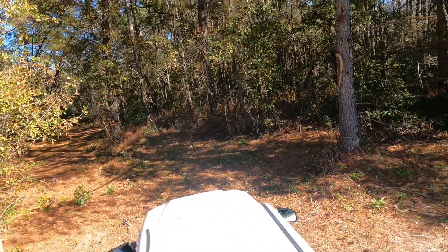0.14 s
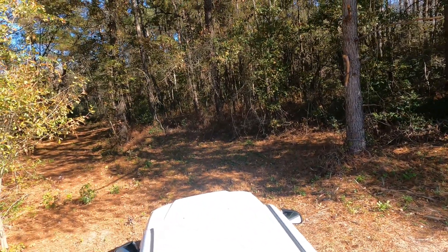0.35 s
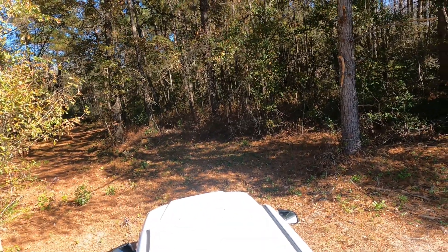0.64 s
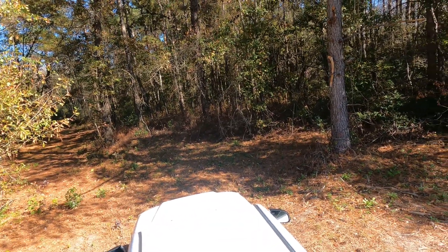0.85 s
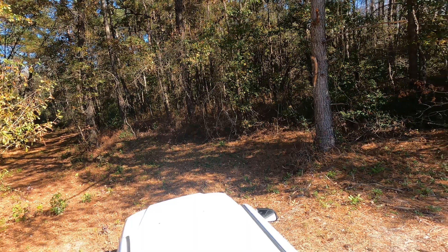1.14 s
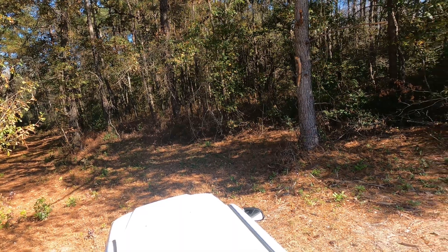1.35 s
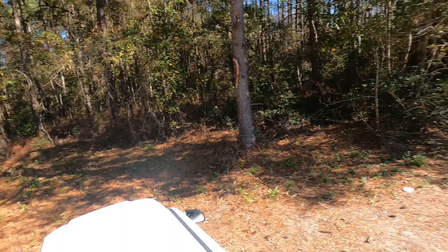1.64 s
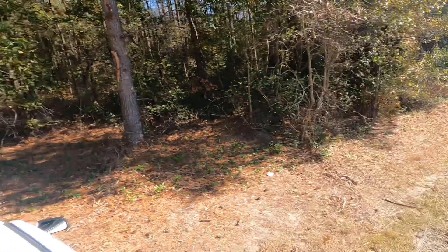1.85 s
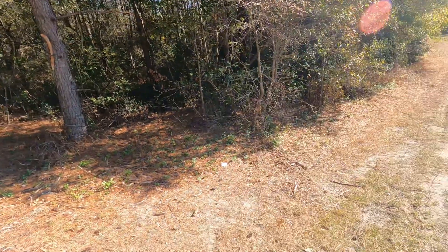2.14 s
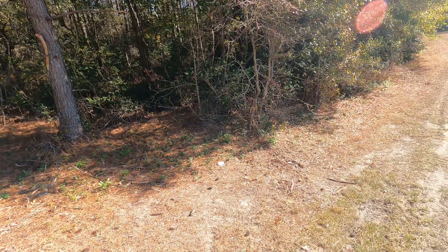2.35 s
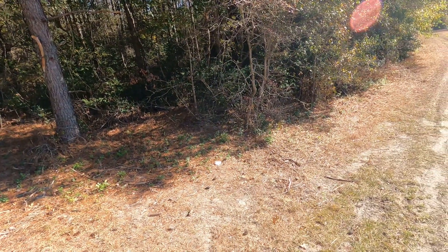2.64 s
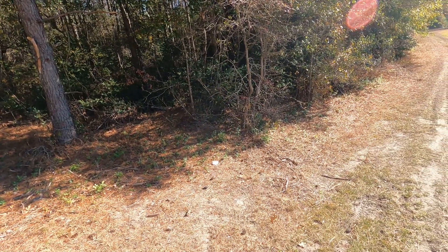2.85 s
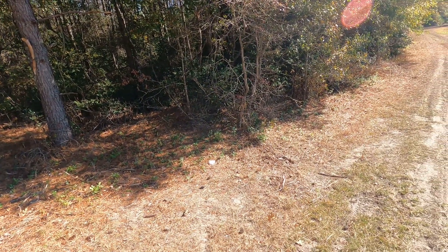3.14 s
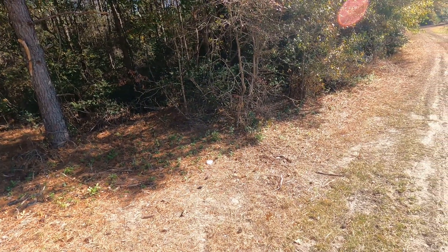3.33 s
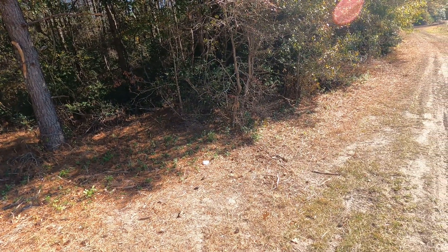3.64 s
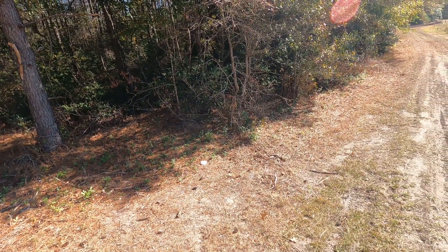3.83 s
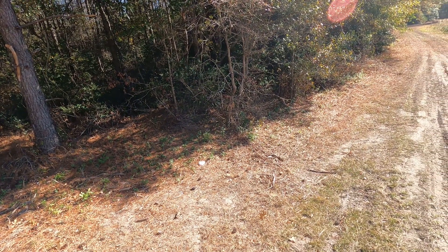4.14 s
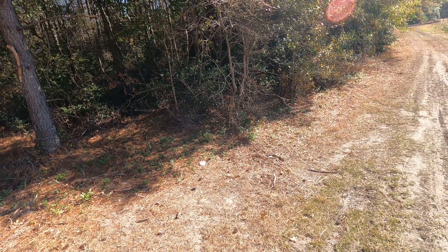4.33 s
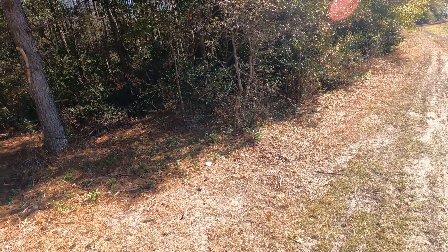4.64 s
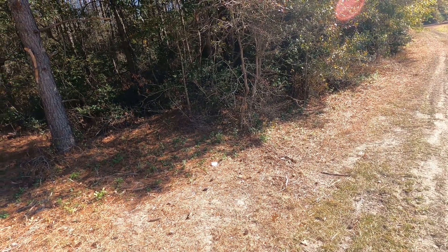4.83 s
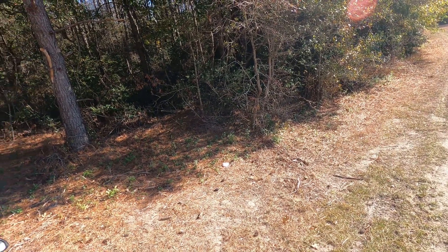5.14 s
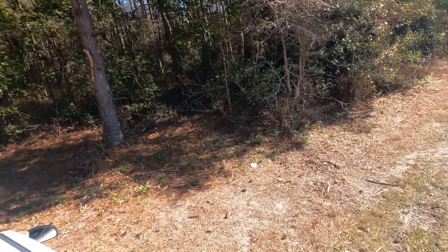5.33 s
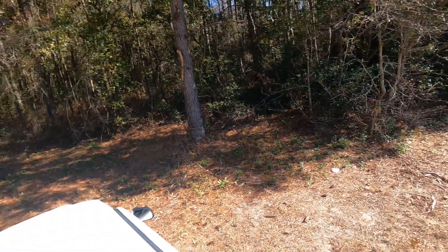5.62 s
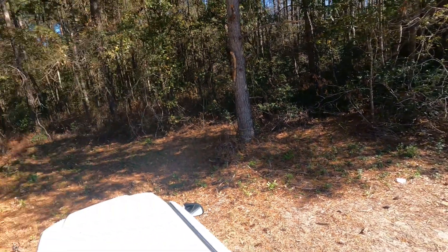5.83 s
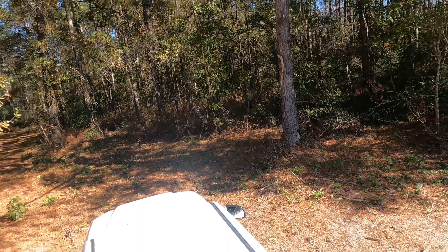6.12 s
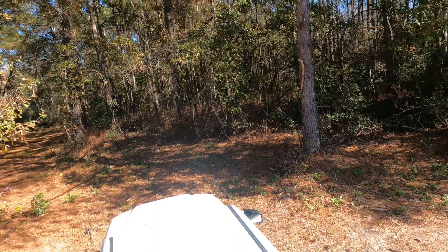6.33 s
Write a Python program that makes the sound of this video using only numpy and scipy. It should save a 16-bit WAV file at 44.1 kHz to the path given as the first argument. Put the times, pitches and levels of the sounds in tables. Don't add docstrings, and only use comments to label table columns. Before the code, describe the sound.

Far-off hunting dogs cry in short ringing yelps through the trees while crickets trill all around and light wind bumps the microphone.

```python
import sys
import numpy as np
from scipy import signal
from scipy.fft import rfft, irfft
from scipy.io import wavfile
from scipy.ndimage import uniform_filter1d

SR = 44100
rng = np.random.default_rng(int(sys.argv[2]) if len(sys.argv) > 2 else 0)


def persist_wave(psi):
    counts = np.round(np.clip(psi, -1, 1) * 32767).astype(np.int16)
    wavfile.write(sys.argv[1], SR, np.atleast_2d(counts).T)


def gain_from_decibels(decibels):
    exponent = np.asarray(decibels, float) / 20
    return 10 ** exponent


N = 285768
LEAD = 1


def evened(x):
    return x / np.sqrt(np.mean(x ** 2) + 1e-20)


def read(points, hz):
    f, value = np.transpose(points)
    return np.interp(np.log(hz + 1), np.log(f + 1), value)


def curve(rows):
    s, *columns = np.transpose(rows)
    return [np.interp(np.arange(N) / SR, s, c) for c in columns]


def add(mix, s, sound):
    part = mix[..., round(s * SR):][..., :sound.shape[-1]]
    part += sound[..., :part.shape[-1]]


def sides(pan_db):
    return gain_from_decibels(np.array([pan_db / 2, -pan_db / 2]))


def turned(ends, s=None):
    # time_s, turn (0-1)
    turning = [
        (0, 0),
        (.85, 0),
        (1.05, .15),
        (1.35, .08),
        (1.8, .55),
        (2.2, .95),
        (5.2, 1),
        (5.7, .4),
        (5.9, .03),
        (6.48, 0),
    ]
    at, turn = np.transpose(turning)
    when = np.arange(N) / SR if s is None else s
    return ends[0] + (ends[1] - ends[0]) * np.clip(np.interp(when, at, turn), 0, 1)


def colour(x, gain_db, lag_s=0):
    hz = np.fft.rfftfreq(x.shape[-1], 1 / SR)
    return irfft(rfft(x) * gain_from_decibels(read(gain_db, hz)) * np.exp(-2j * np.pi * hz * lag_s), x.shape[-1])


def resonate(x, hz, width):
    r = np.exp(-np.pi * width / SR)
    a = [1, -2 * r * np.cos(2 * np.pi * hz / SR), r * r]
    return signal.lfilter([1], a, signal.lfilter([1, 0, -1], a, x))


def pair(hz, width, same):
    a, b = rng.standard_normal((2, N))
    same = np.clip(same, 0, 1)
    return evened(resonate(np.array([a, same * a + np.sqrt(1 - same ** 2) * b]), hz, width))


def noise(gain_db, pan_db, patchy_db):
    # pitch_hz, likeness (0-1)
    likeness = [(30, 0.65), (100, 0.28), (200, 0.76), (600, 0.13), (2000, 0.12), (8000, 0.71)]
    frames, hz = N // 256 + 5, np.fft.rfftfreq(1024, 1 / SR)
    a, b, c, d, patches = rng.standard_normal((frames, 513, 5)).T
    patches = evened(uniform_filter1d(uniform_filter1d(patches, size=10, axis=0), size=14, axis=1))
    same = np.clip(read(likeness, hz), -1, 1)[:, None]
    left = a + 1j * b
    z = np.array([left, same * left + np.sqrt(1 - same ** 2) * (c + 1j * d)])
    z *= gain_from_decibels(read(gain_db, hz)[:, None] + patchy_db * patches)
    z *= sides(read(pan_db, hz))[:, :, None]
    return evened(signal.istft(z, nperseg=1024, noverlap=768)[1][:, :N])


def roughness(effort_db):
    return np.clip(.018 * (-35 - effort_db), 0, 1)


def yelp(start, length, first_hz, top_hz, effort_db):
    glide_share, swell_db = 0.501, 5.5
    rough = roughness(effort_db)
    return [(start, first_hz, effort_db - swell_db, rough),
            (start + glide_share * length, top_hz, effort_db - swell_db * (1 - glide_share), rough),
            (start + length, top_hz, effort_db, rough)]


def bay(start, length, hz, first_db, last_db):
    scoop_s, scoop_share, scoop_db = 0.014, 0.035, 2.5
    sag_hz_per_s = 264.5
    return [(start, hz * (1 - scoop_share), first_db - scoop_db, roughness(first_db)),
            (start + scoop_s, hz, first_db, roughness(first_db)),
            (start + length, hz - sag_hz_per_s * length, last_db, roughness(last_db))]


def note(rows):
    # pitch_hz, level_db
    throat = [(400, -21), (680, -5), (1000, -4.5), (1350, 3), (1700, -9.5), (2100, -22.5), (2500, -25.5),
              (3000, -61)]
    # pitch_hz, level_db per Hz
    breath = [(450, -61), (600, 24), (800, 19), (1200, -40), (1500, 8), (2200, 7.5), (2600, -62)]
    s, *columns = np.transpose(rows)
    t = np.arange(s[0], s[-1], 1 / SR)
    hz, effort_db, rough = (np.interp(t, s, c) for c in columns)
    shake, air = rng.standard_normal((2, SR))
    shake = evened(uniform_filter1d(shake, size=60))[:len(t)]
    turns = np.cumsum(hz * (1 + 0.23 * rough * shake)) / SR
    voice = sum(gain_from_decibels(read(throat, k * hz)) * np.cos(2 * np.pi * k * turns) for k in range(1, 5))
    air = evened(irfft(rfft(air) * gain_from_decibels(read(breath, np.arange(SR // 2 + 1)))))[:len(t)]
    voice = voice * (1 + rough * np.cos(np.pi * turns)) * np.sqrt(2) + 1.1 * rough * air
    return s[0] + LEAD, gain_from_decibels(effort_db) * voice * signal.windows.tukey(len(t), .25)


def woods(x, same):
    # pitch_hz, die_s
    dying = [(500, 4.2), (750, 4.3), (1000, 3.85), (1400, 2.78), (2000, 2.9), (3000, 0.87)]
    # delay_s, level_db
    tree_lines = [
        (.05, -7.5),
        (.105, -11.5),
        (0.161, -11),
        (.27, -13),
    ]
    size = 3 * SR
    taps = np.zeros((2, size))
    at = np.arange(500, size - 20, 20) + rng.integers(0, 20, (2, (size - 501) // 20))
    np.put_along_axis(taps, at, rng.choice([-1., 1.], at.shape), 1)
    hz, t, z = signal.stft(taps, SR, nperseg=256)
    tail = signal.istft(z * gain_from_decibels(-60 * t / read(dying, hz)[:, None]), SR, nperseg=256)[1]
    tail = tail * gain_from_decibels(-27.5)
    for delay, db in tree_lines:
        add(tail[0], delay, gain_from_decibels(db) * np.ones(1))
    mid, side = signal.fftconvolve(x[None], tail, axes=1)
    return np.array([mid + (1 - same) * side, mid - (1 - same) * side])


def hounds():
    # start_s, length_s, first_hz, top_hz, effort_db
    yelps = [(-.26, .06, 760, 840, -52), (-.2, 0.062, 1084, 1127, -44), (2.595, 0.0697, 989, 1129, -33),
             (2.908, 0.049, 963.5, 1020, -31.5), (3.225, 0.04, 770, 815, -49),
             (3.237, 0.028, 984, 1148, -40), (3.629, 0.022, 800, 833, -48.5),
             (3.642, 0.032, 996, 1055, -39), (4.08, 0.022, 781, 788, -49), (4.1, 0.0373, 1010, 1141, -37),
             (5.81, 0.048, 878, 887, -44.5), (6.14, .025, 752, 840, -45), (6.161, .047, 932, 1055, -40.5)]
    # start_s, length_s, pitch_hz, first_db, last_db
    bays = [
        (-.15, .13, 697.7, -47, -46.5),
        (2.656, 0.0647, 702, -38, -63),
        (2.956, 0.041, 677.3, -40, -40.5),
        (3.266, 0.06, 686.4, -46, -49),
        (3.668, 0.049, 673, -40, -38),
        (4.125, 0.0766, 663.3, -39, -55),
        (5.836, 0.13, 689.8, -47, -48.5),
        (6.18, 0.14, 657.8, -43.5, -54),
    ]
    # time_s, pitch_hz, effort_db, roughness (0-1)
    far_cry = [
        (1.2, 769, -57, 0.16),
        (1.3, 753, -66.5, 0.04),
        (1.45, 732, -75, 0.09),
        (1.6, 746, -61.5, 0),
        (1.75, 754, -84, 0.06),
    ]
    # pitch_hz, gain_db
    scatter = [(500, 6.5), (680, 1), (820, 9), (1000, 2.5), (1400, 2), (2200, 1.5)]
    dry = np.zeros(N + LEAD * SR)
    for rows in [yelp(*row) for row in yelps] + [bay(*row) for row in bays]:
        add(dry, *note(rows))
    shimmer = rng.standard_normal(len(dry))
    shimmer = evened(uniform_filter1d(uniform_filter1d(shimmer, size=250), size=250))
    smeared = (signal.hilbert(dry) * np.exp(.44j * shimmer)).real
    wet = woods(colour(smeared, scatter), same=0.74)[:, :len(dry)]
    dip_hz, dip_width_hz, dip_share = 560, 530, 0.79
    low = signal.lfilter(*signal.iirpeak(dip_hz, dip_hz / dip_width_hz, SR), dry)
    start, howl = note(far_cry)
    add(wet, start, colour(howl, [(800, 7), (1300, -30)]) * shimmer[:len(howl)])
    ports = gain_from_decibels(3.0) * (dry - dip_share * low) + wet
    ports = colour(ports, [(500, -0.064), (2000, 0.079)], lag_s=np.array([[8e-5], [0]]))
    return ports[:, LEAD * SR:] * sides(-0.59)[:, None]


def chorus():
    # pitch_hz, level_db per Hz
    spread = [(3200, -24.5), (3450, -18.5), (3600, -18), (3750, -3.5), (3940, 0), (4190, -5), (4330, -18.5),
              (4550, -19), (4900, -16.5)]
    level_db, pan_db = -47.5, turned((5.5, 0.5))
    t, out = np.arange(N) / SR, np.zeros((2, N))
    drift = np.cumsum(rng.standard_normal(2 * N)) * 0.0818
    tones = np.linspace(3500, 4500, 30)
    for k, (beat, start, place, size) in enumerate(rng.standard_normal((30, 4))):
        cycle = 2 * np.pi * (43 * (1 + .06 * beat) * t + start)
        wing = np.sin(cycle)
        turn = 2 * np.pi * tones[k] * t + 2.07 * wing + drift[k * 9000:][:N]
        tone = np.sin(turn + np.array([[.6], [-.6]]) * place)
        out += gain_from_decibels(1.5 * size) * np.maximum(wing + .3, 0) * tone
    blur = pair(hz=3850, width=1800, same=0.62)
    return gain_from_decibels(level_db) * sides(pan_db) * evened(colour(evened(out) + 0.54 * blur, spread))


def katydid():
    # time_s, effort_db
    effort = [
        (0, -76),
        (.35, -69),
        (.7, -74),
        (1.2, -70.5),
        (1.7, -76.5),
        (5.9, -78.5),
        (6.3, -71.5),
        (6.48, -80),
    ]
    # pitch_hz, level_db per Hz
    far_colour = [(9000, -30), (10500, -9), (12000, -11), (13000, -10), (13600, -19), (13900, -38)]
    strokes_per_s = 64
    level_db = curve(effort)[0] + turned((0, -8.5))
    scrape = np.exp(1.5 * np.cos(2 * np.pi * strokes_per_s * np.arange(N) / SR))
    near = gain_from_decibels(-1.5) * sides(26.0)[:, None] * evened(scrape * pair(hz=12000, width=810, same=0.94))
    far = gain_from_decibels(5.0) * noise(far_colour, [(9000, 15), (16000, 22)], patchy_db=4.5)
    trill = gain_from_decibels(-71.5 + turned((0, 0.5))) * sides(2.8)[:, None] * pair(hz=8450, width=190, same=0.39)
    flicker = evened(uniform_filter1d(rng.standard_normal(N), size=1800))
    heard = flicker > turned((-.9, 11))
    fizz = noise([(13400, -60), (13700, -4.0), (15700, -9)], [(9000, 8), (16000, 8)], patchy_db=5.0)
    top = gain_from_decibels(level_db - 5) * heard * fizz
    return colour(gain_from_decibels(level_db) * (near + far) + trill, [(13600, -2.0), (14000, -59)]) + top


def wind():
    # middle_s, length_s, lump_db, flutter_db
    gusts = [(0.05, 0.13, -44.5, -68), (0.53, 0.13, -42, -55), (1.069, 0.36, -55, -56.5),
             (1.515, 0.23, -50, -54.5), (1.737, 0.096, -44, -70), (1.982, 0.48, -50, -49.5),
             (2.428, 0.58, -50, -51.5), (2.778, 0.23, -68, -45.5), (3.04, 0.27, -69, -46.5),
             (3.285, 0.19, -48, -54.5), (3.5, .15, -57, -50), (3.695, 0.29, -59, -66), (4, .15, -48, -53),
             (4.178, 0.18, -50, -71), (4.485, 0.22, -60, -49.5), (4.786, 0.084, -56, -78),
             (5.008, 0.092, -54, -49), (5.506, 0.33, -43.5, -56), (5.78, 0.14, -57, -56.5),
             (6.005, 0.12, -43, -51.5), (6.227, 0.11, -53, -61), (6.47, 0.14, -44.5, -54)]
    calm_db = np.array((-63, -81.5))
    t = np.arange(N) / SR
    blow = gain_from_decibels(calm_db)[:, None] * np.ones(N)
    for middle, length, *db in gusts:
        blow = blow + gain_from_decibels(np.array(db) - 2.5)[:, None] * np.exp(-(2.86 * (t - middle) / length) ** 2)
    lumps = blow[0] * pair(hz=26.7, width=25, same=0.7)
    flutter = blow[1] * pair(hz=78.6, width=66, same=.9)
    return (lumps + flutter) * sides(-0.95)[:, None]


def road():
    # time_s, level_db
    traffic = [
        (0, -59),
        (1.1, -54.5),
        (1.7, -56.5),
        (3.2, -61),
        (3.4, -54),
        (4.3, -53.5),
        (5.1, -53.5),
        (5.6, -55),
        (6.48, -59),
    ]
    rumble = gain_from_decibels(curve(traffic)[0]) * pair(hz=172.5, width=79, same=0.67) * sides(-1.9)[:, None]
    waver = rng.standard_normal(N)
    waver = evened(uniform_filter1d(uniform_filter1d(waver, size=4000), size=4000))
    return rumble * gain_from_decibels(3 * waver)


def leaves_and_air():
    # pitch_hz, level_db per Hz
    hiss = [(60, -26.5), (250, 4), (500, -3.5), (1000, -5.5), (1500, -9), (2000, -12.5), (3000, -18),
            (5000, -23.5), (6500, -17), (8000, -11.5), (10500, -23.5), (12600, -25.5), (13300, -38),
            (13800, -75)]
    # pitch_hz, left_over_right_db
    balance = [(100, -9), (300, -5.5), (1000, -3), (3000, 1.5), (8000, 1.5), (13000, -4)]
    return gain_from_decibels(-58) * noise(hiss, balance, patchy_db=2.1)


def chirp(length, hz, glide, arch):
    u = np.linspace(-1, 1, round(length * SR))
    tone = np.sin(2 * np.pi * np.cumsum(hz + glide * u - arch * u ** 2) / SR)
    return tone * signal.windows.tukey(len(u), .4)


def strokes(runs):
    return [(s, np.interp(s, [start, end], [first_db, last_db]))
            for start, end, gap, first_db, last_db in runs
            for s in np.arange(start, end, gap)]


def ground_crickets():
    # start_s, end_s, gap_s, first_db, last_db
    runs = [
        (.079, 1.5, .1268, -57, -53.5),
        (1.6252, 1.8, .1287, -54.5, -55.5),
        (1.8911, 2.32, .1319, -61, -63),
        (2.4279, 4.7, .1241, -62.5, -63),
        (5.28, 5.8, .1211, -65, -58),
        (5.9214, 6.46, .1298, -58, -54),
    ]
    out = np.zeros((2, N))
    for s, db in strokes(runs):
        stroke = chirp(0.021, hz=turned((7300, 7360), s), glide=-82, arch=466)
        after = chirp(0.035, hz=7250, glide=70, arch=200)
        add(out, s - .002, gain_from_decibels(db) * sides(8.9)[:, None] * stroke)
        add(out, s + 0.013, gain_from_decibels(db - 8.5) * sides(9.9)[:, None] * after)
    return out


def buzzing_insect():
    # start_s, end_s, gap_s, first_db, last_db
    runs = [
        (.136, 5.05, .2205, -69, -73.5),
        (5.265, 6.4, .2245, -72, -74),
    ]
    gate = np.zeros(N)
    for s, db in strokes(runs):
        add(gate, s, gain_from_decibels(db) * np.hanning(round(.09 * SR)))
    return gate * gain_from_decibels(turned((0, -2))) * sides(4.0)[:, None] * pair(hz=9350, width=300, same=.7)


def field_cricket():
    starts = [0.206, 0.6782, 1.1636, 1.6107, 2.08, 2.5376, 3.0056, 3.468, 3.933, 4.4002, 4.8614, 5.3295,
              5.8017, 6.2502]
    out = np.zeros((2, N))
    for s in starts:
        gains = gain_from_decibels(-51) * sides(turned((-5, 5), s))[:, None]
        for gap in (0, .0235):
            add(out, s + gap - .002, gains * chirp(.018, hz=5459, glide=-130, arch=-25))
    return out


def handling():
    # start_s, level_db, centre_hz, die_s (time to fall 60 dB)
    ticks = [(0.542, -57, 6850, 0.019), (1.059, -58.5, 7940, 0.13), (1.514, -55, 5200, 0.15),
             (1.514, -59.5, 8930, 0.12), (1.755, -63, 11000, 0.032), (1.978, -63, 1190, 0.54),
             (2.04, -67, 1290, 0.18), (2.471, -66, 1300, 0.45), (5.995, -60, 2170, 0.069),
             (6.246, -62, 9200, .06), (6.287, -74, 12000, .05), (6.33, -56, 12000, .05)]
    out, t = np.zeros((2, N)), np.arange(8000) / SR
    for s, db, hz, t60 in ticks:
        puff = resonate(rng.standard_normal(8000), hz, 0.53 * hz)
        add(out, s, gain_from_decibels(db - 60 * t / t60) * evened(puff) * sides(3.6)[:, None])
    return colour(out, [(12800, 2.2), (14000, -22), (14500, -60)])


def far_bird():
    out = np.zeros((2, N))
    add(out, 2.21, gain_from_decibels(-73.5) * chirp(.07, hz=2630, glide=22, arch=60))
    return out


def scene():
    insects = chorus() + ground_crickets() + buzzing_insect() + field_cricket()
    background = wind() + road() + leaves_and_air()
    low = hounds() + insects + far_bird() + background
    high = katydid() + handling()
    return colour(low, [(12700, -1), (13300, 7), (13900, -55)]) + high


def band_limit(x):
    return signal.sosfilt(signal.butter(12, 15690, fs=SR, output="sos"), x)


def record(dry):
    return band_limit(dry)


dry = scene()
out = record(dry)
persist_wave(out)
```